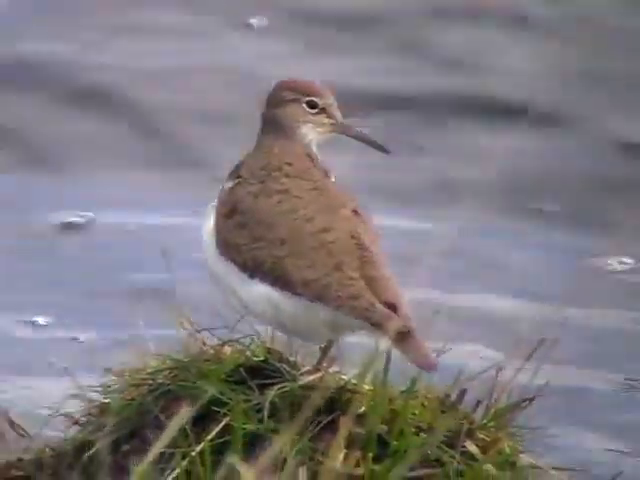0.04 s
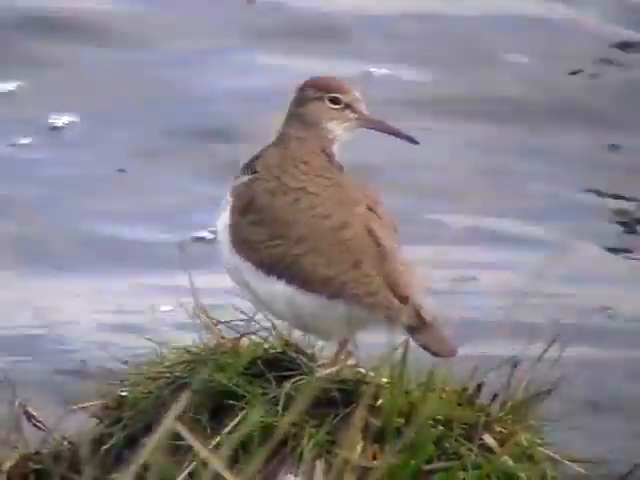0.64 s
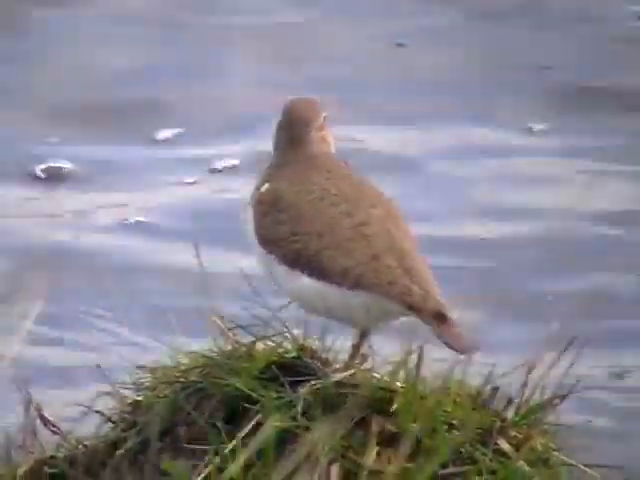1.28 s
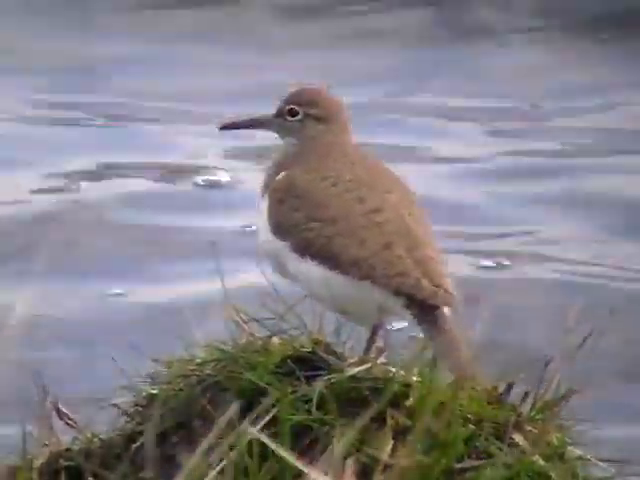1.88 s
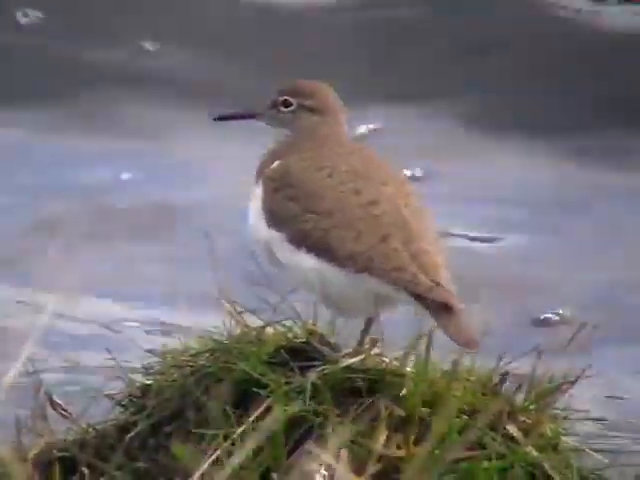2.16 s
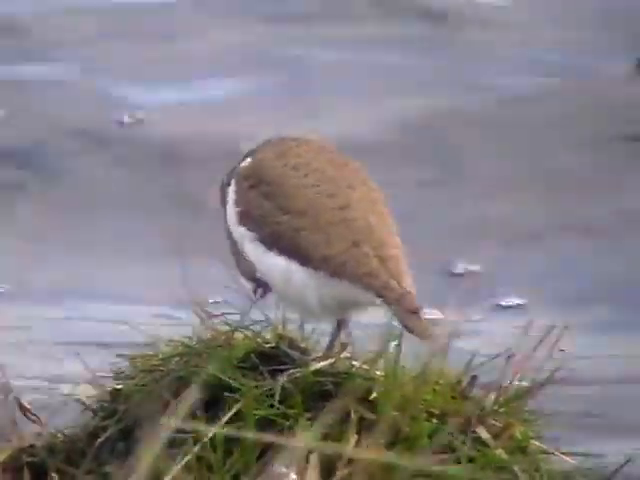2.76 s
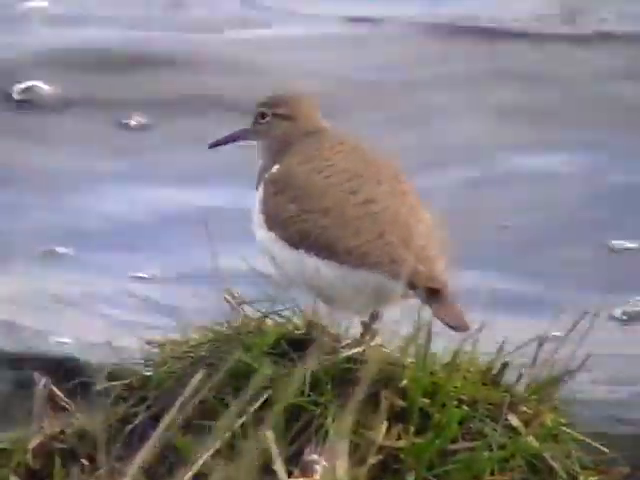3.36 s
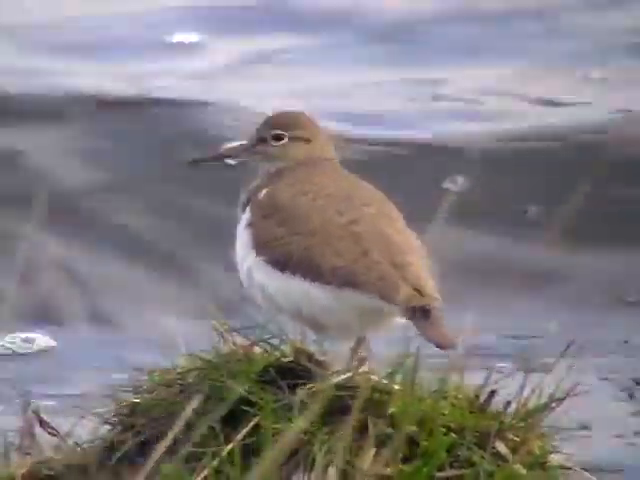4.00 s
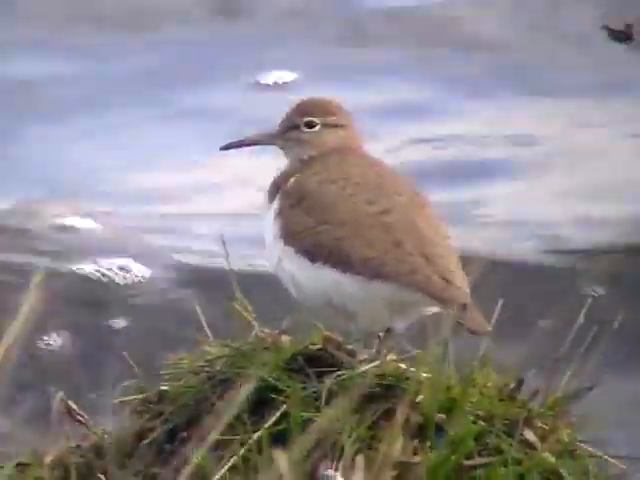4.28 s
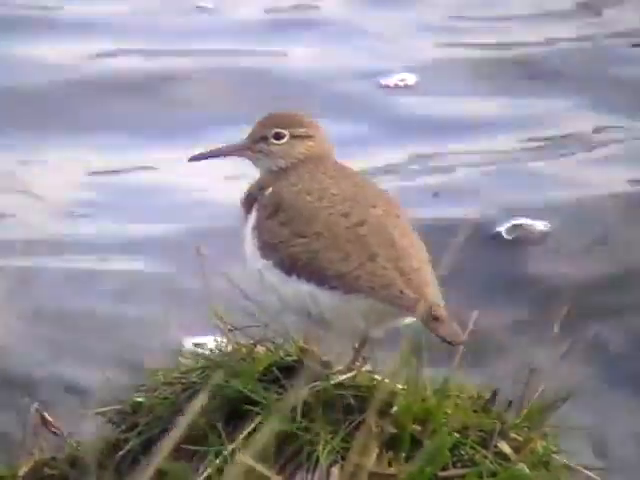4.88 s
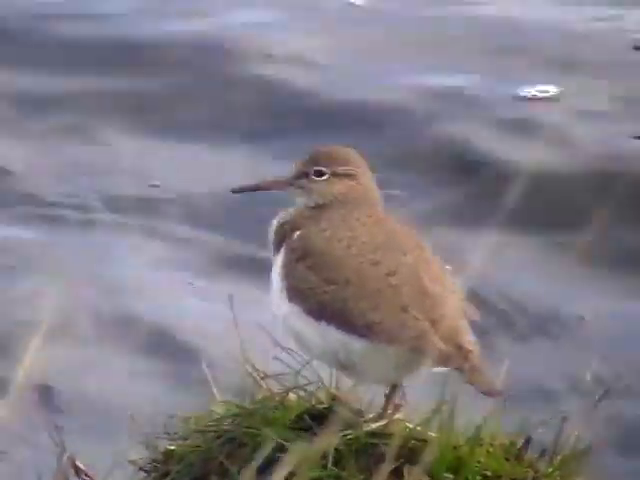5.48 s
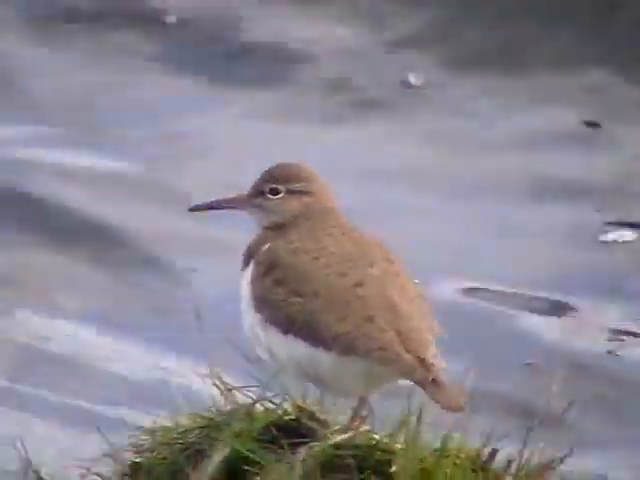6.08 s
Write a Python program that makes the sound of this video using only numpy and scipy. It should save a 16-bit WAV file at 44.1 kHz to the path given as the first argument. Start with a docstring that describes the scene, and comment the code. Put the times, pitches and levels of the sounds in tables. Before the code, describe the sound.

Wind blows directly on a stereo microphone at a lakeshore, over a soft, even rush of water and hissing grass. A short gust thumps and knocks the microphone at about 0.2 seconds, then settles to a light rumble. Some way off, small birds whistle faint, thin, slurred notes, one repeating a plain rising pipe through the first two seconds. At 2.5 seconds the gusts return with low thumps and a couple of small knocks while the birds thin out. From 3.3 seconds the wind is at its strongest, a lumpy rumble leaning right, peaking near 3.5, 4 and 4.9 seconds and buffeting on to the end. The birds pick up again from about 4 seconds, with clearer chirps around 4.4 and 5.5. Dry stems tick faintly now and then, with small clicks near 1 and 4.9 seconds. The background rush swells around 5 seconds.

```python
"""A lakeshore in a rising breeze, heard through a stereo microphone out in the wind.
Close up, gusts rumble on its two ports, eddies thump them and the hardest puffs knock the housing.
Behind that lies the even rush of water and grass, with dry stems ticking against each other.
Some way off, small birds whistle thin slurred notes, many blurred by leaves;
banks and trees return a short, faint echo."""
import sys
import numpy as np
from scipy import signal
from scipy.io import wavfile
from scipy.ndimage import uniform_filter1d

SR = 44100
rng = np.random.default_rng(int(sys.argv[2]) if len(sys.argv) > 2 else 0)


def unload_audio(sound):
    """Save the sound as a 16-bit wav file, at the path given as the first command line argument."""
    columns = np.transpose(np.atleast_2d(sound))
    # keep every value between -1 and 1, then stretch to whole-number steps
    steps = np.round(np.clip(columns, -1, 1) * 32767)
    wavfile.write(sys.argv[1], SR, steps.astype(np.int16))


N = 275625
T = np.arange(N) / SR

# Breeze over the shore: t/s, rush/dB, grass hiss/dB. Levels in all tables are relative.
BREEZE = [(0.0, -55.5, -74.5), (1.88, -55.5, -76.5), (3.38, -55.5, -74), (4.98, -47, -73.5),
          (5.46, -47.5, -72), (5.94, -50.5, -73.5), (6.25, -47.5, -71)]


def from_db(db):
    return 10 ** (np.asarray(db) / 20)


def rms_one(x):
    return x / np.sqrt(np.mean(x ** 2) + 1e-20)


def in_time(rows):
    """One curve per column after t/s, joined by straight lines."""
    times, *columns = np.transpose(rows)
    return [np.interp(T, times, column) for column in columns]


def at_hz(points, hz):
    freqs, values = np.transpose(points)
    return np.interp(np.log(hz), np.log(freqs), values)


def panned(x, pan_db):
    """Positive pan_db favours the left."""
    return x * from_db([[pan_db / 2], [-pan_db / 2]])


def band(x, low_hz, high_hz):
    sos = signal.butter(2, [low_hz, min(high_hz, SR / 2 - 100)], "band", fs=SR, output="sos")
    return signal.sosfilt(sos, x + 1e-18)


def resonate(x, hz, width_hz):
    return signal.lfilter(*signal.iirpeak(hz, hz / width_hz, fs=SR), x)


def add(out, start_s, sound):
    i = max(int(start_s * SR), 0)
    out[..., i:i + sound.shape[-1]] += sound[..., :N - i]


def drift(rate_hz):
    """A smooth random curve with spread 1."""
    step = 40
    pole = np.exp(-2 * np.pi * rate_hz * step / SR)
    slow = signal.lfilter([1], [1, -2 * pole, pole * pole], rng.standard_normal(N // step + 2002))[2000:]
    return np.interp(np.arange(N) / step, np.arange(len(slow)), rms_one(slow))


def noise_bands(spectrum, likeness, count):
    """Half-octaves of stereo noise from 25 Hz up, as (f/Hz, band); together their rms is about 1."""
    edges = 25 * 2 ** (np.arange(count + 1) / 2)
    centres = np.sqrt(edges[1:] * edges[:-1])
    gains = from_db(at_hz(spectrum, centres))
    gains /= np.sqrt(np.sum(gains ** 2 * np.diff(edges)) * 2 / SR)
    for k, hz in enumerate(centres):
        mid, side = gains[k] * band(rng.standard_normal((2, N)), edges[k], edges[k + 1])
        alike = np.clip(at_hz(likeness, hz), -1, 1)
        yield hz, np.sqrt((1 + alike) / 2) * mid + np.sqrt((1 - alike) / 2) * side * [[1], [-1]]


def airy(spectrum, likeness, flicker_db):
    """Wide noise whose bands each flicker a little."""
    return sum(x * from_db(flicker_db * drift(27)) for _, x in noise_bands(spectrum, likeness, count=18))


def buffeting(lump_db=2.0, lump_hz=46.6, surge_db=1.12, surge_hz=11):
    """Turbulence at the ports: big eddies rumble in both, small ones flutter in each, in lumps."""
    # Wind strength at the microphone: t/s, rumble/dB, flutter/dB
    strength = [(0.0, -45, -37.5), (0.07, -46, -65), (0.15, -38.5, -30), (0.21, -42.5, -37),
                (0.29, -44, -32), (0.4, -47.5, -48.5), (0.7, -49, -58.5), (0.9, -45.5, -50.5),
                (1.07, -55, -63), (1.67, -51, -77), (1.71, -43.5, -43.5), (1.9, -55.5, -81),
                (2.33, -54, -66.5), (2.52, -32, -36.5), (2.62, -31, -37), (2.655, -44.5, -41),
                (2.9, -34, -48.5), (3.03, -38.5, -40.5), (3.1, -36, -38.5), (3.14, -43, -55),
                (3.245, -55, -63), (3.26, -20.5, -44.5), (3.38, -37, -45.5), (3.48, -18.5, -39.5),
                (3.6, -30.5, -39), (3.76, -31.5, -42.5), (3.81, -42, -44), (3.91, -31, -53),
                (3.95, -24, -41), (4.04, -30, -37), (4.14, -40.5, -52), (4.35, -26, -37.5),
                (4.44, -36, -43.5), (4.61, -34.5, -40), (4.75, -22, -41), (4.81, -35.5, -46.5),
                (4.9, -18.5, -38), (4.97, -31, -40), (5.05, -39, -43.5), (5.22, -29.5, -48),
                (5.5, -33, -44), (5.7, -38.5, -41.5), (5.83, -38.5, -41.5), (5.97, -30, -42),
                (6.04, -31.5, -38), (6.18, -31, -37.5), (6.25, -48, -55)]
    # It swirls, then settles on the right port: t/s, left-right/dB, unshared rumble/dB
    direction = [(0, -2.5, 5.5), (3.1, 4, 7), (3.3, -5, -6), (6.25, -6, -1)]
    # Spectrum of the turbulence: f/Hz, density/dB
    spectrum = [(20, -24), (40, -19.5), (62, -3.5), (85, -2.5), (120, -1.5), (170, -5.5), (240, -8),
                (340, -17.5), (600, -31), (1200, -53.5), (3000, -86)]
    # Likeness of the two ports: f/Hz, correlation
    likeness = [(30, 0.95), (70, 0.75), (130, 0.26), (220, 0.22), (400, 0.84), (2000, 0.63)]
    rumble_db, flutter_db = in_time(strength)
    facing_db, apart_db = in_time(direction)
    lumps = 1.64 * drift(lump_hz) + 0.44 * np.array([drift(lump_hz), drift(lump_hz)])
    lumps = lump_db * np.clip(lumps, -2, 1.5)
    surges = surge_db * np.clip(drift(surge_hz), -1.5, 1.5)
    out = 0
    for hz, noise in noise_bands(spectrum, likeness, count=14):
        small = at_hz([(90, 0.081), (240, 1)], hz)  # share of small eddies
        level_db = (1 - small) * (rumble_db + 4) + small * (flutter_db + 4.5)
        unrest_db = surges + lumps * (0.62 + 0.4 * small)
        shared = noise.mean(axis=0)
        ports = shared + (noise - shared) * from_db(apart_db * (1 - small))
        out = out + panned(ports * from_db(level_db + unrest_db), facing_db - 4.2 * small)
    return out


def shore_rush():
    """Distant water and grass rush with the breeze over a steady bed of air; the top falls steeply."""
    # Spectrum of the rush: f/Hz, density/dB
    rush_spectrum = [(25, 2), (70, 5.5), (150, 12), (350, 4.5), (680, 4.5), (1200, -5.5), (2400, -15),
                     (3200, -23.5), (4400, -38), (5500, -18), (13000, -40)]
    # Spectrum of the far shore in still air: f/Hz, density/dB
    air_spectrum = [(25, -59), (700, 8), (2000, 2), (3000, -2.5), (4200, -2), (5200, -21), (7000, 2.5),
                    (13000, -15)]
    # Left-right likeness of the shore: f/Hz, correlation
    likeness = [(60, 0.93), (600, 0.98), (2000, 0.85), (4500, 0.7), (13000, 0.33)]
    rush_db, _ = in_time(BREEZE)
    rush = from_db(rush_db + 4.5) * airy(rush_spectrum, likeness, flicker_db=1.3)
    far_shore = from_db(-57.5) * airy(air_spectrum, likeness, flicker_db=2.0)
    return signal.sosfilt(signal.butter(10, 4700, fs=SR, output="sos"), rush + far_shore)


def grass_hiss():
    """The breeze draws a high, wide hiss from the grass."""
    # Spectrum of the grass: f/Hz, density/dB
    spectrum = [(25, -17), (3000, 6), (5500, 6.5), (7000, 0), (9000, 9.5), (12500, 5), (15000, -4)]
    # Left-right likeness of the grass: f/Hz, correlation
    likeness = [(3000, 0.45), (6000, 0.76), (9000, 0.038), (13000, -0.39)]
    _, hiss_db = in_time(BREEZE)
    return from_db(hiss_db + 5) * airy(spectrum, likeness, flicker_db=1.4)


def ringing_hiss():
    """A faint steady hiss, dead centre, rings in a few narrow bands."""
    # Resonances of the hiss: f/Hz, width/Hz, level/dB
    modes = [(5260, 440, -88.5), (7550, 350, -84.5), (8680, 93, -87)]
    return sum(from_db(db) * rms_one(resonate(rng.standard_normal(N), hz, width))
               for hz, width, db in modes)


def stem_ticks(most_per_s=120, decay_s=0.0009):
    """Dry stems snap together; fainter touches come thicker and harder as the grass hiss rises."""
    # The distinct snaps: t/s, level/dB
    snaps = [(0.031, -59), (0.346, -63), (.5872, -69), (.725, -69), (1.0086, -62), (1.828, -65),
             (2.3037, -64), (2.914, -58.5), (2.9375, -62), (3.828, -60), (3.882, -57), (4.1194, -54.5),
             (4.4634, -63), (4.585, -63), (4.862, -56), (5.108, -65), (5.195, -62), (5.255, -63),
             (5.306, -61), (5.6353, -63), (5.852, -56), (6.085, -59)]
    _, hiss_db = in_time(BREEZE)
    clicks = np.zeros(N)
    for start, level_db in snaps:
        add(clicks, start, from_db([level_db + 12]))
    touched = rng.random(N) < most_per_s * from_db(3 * (hiss_db - hiss_db.max())) / SR
    touches = touched * from_db(hiss_db + 15.5 + 4 * np.clip(rng.standard_normal((2, N)), -2, 2))
    t = np.arange(SR // 100) / SR
    rustle = rng.standard_normal(len(t)) * np.exp(-t / decay_s)
    snap = 3 * (t == 0) + 2.5 * rustle / np.linalg.norm(rustle)
    return band(signal.fftconvolve(clicks + touches, snap[None])[:, :N], 3500, 13700)


def whistle(length, pitches, waver, flutter_db, edge_s=0.011, sag_db=14, swell_db=0):
    """A bird's wavering, near-pure tone glides through pitches, losing sag_db an octave below the top."""
    u = np.linspace(0, 1, int(max(length, 0.02) * SR))
    glide = np.interp(u, np.linspace(0, 1, len(pitches)), pitches)
    hz = uniform_filter1d(glide, len(u) // 10)
    wobble, flutter = rms_one(band(rng.standard_normal((2, SR // 3)), 25, 150))[:, -len(u):]
    to_edge_s = np.minimum(u, 1 - u) * length
    fade = np.sin(np.pi / 2 * np.minimum(to_edge_s / edge_s, 1))
    level_db = flutter_db * np.minimum(flutter, 1.2) + sag_db * np.log2(hz / hz.max()) + swell_db * u
    phase = 2 * np.pi * np.cumsum(hz * (1 + waver * wobble)) / SR
    return rms_one(fade * from_db(level_db) * np.sin(phase))


def piping_bird(rise=0.061, ease=1.79):
    """One bird, some way off, repeats a plain whistle that rises and levels out."""
    # Its whistles: t/s, length/s, top f/Hz, level/dB
    pipes = [(0.094, 0.15, 4330, -63.5), (0.93, 0.17, 4390, -63), (1.33, 0.11, 4460, -61),
             (1.686, 0.097, 4260, -61.5), (2.025, 0.12, 4340, -64), (3.162, 0.14, 4280, -72),
             (3.563, .14, 4400, -66), (3.948, 0.13, 4380, -62.5), (4.718, 0.17, 4350, -64.5)]
    out = np.zeros(N)
    glide = 1 - rise * np.linspace(1, 0, 9) ** ease
    for start, length, top_hz, level_db in pipes:
        note = whistle(length, top_hz * glide, waver=0.0012, flutter_db=3, edge_s=0.0053, sag_db=-6)
        add(out, start, from_db(level_db) * note)
    return out


def shore_echo(x, t60):
    """Banks and trees scatter a thin tail, different at each side."""
    t = np.arange(SR // 2) / SR
    tail = rng.standard_normal((2, len(t))) * from_db(-60 * t / t60) * (t > 0.012)
    return signal.fftconvolve(x[None], tail / np.linalg.norm(tail[0]))[:, :N]


def through_foliage(note, blur, decay_s=0.014):
    """Leaves on the way to the microphone return late copies of a note and break it up."""
    t = np.arange(SR // 15) / SR
    late = rng.standard_normal(len(t)) * np.exp(-t / decay_s)
    paths = (t == 0) + blur * from_db(-2) * late / np.linalg.norm(late)
    heard = signal.fftconvolve(note, paths)
    return heard * np.linalg.norm(note) / np.linalg.norm(heard)


def songbirds():
    """Overlapping songs from among the leaves: slurred notes, some clear and some hoarse."""
    # Kinds of note: name -> pitch as a share of the top pitch, evenly spaced through the note
    slurs = {"sweep": [.68, .72, .76, .81, .96, .99, 1], "climb": [.87, .92, .96, .99, 1], "arch": [.93, 1,
             .99, .95, .88], "dip": [.93, .78, .71, .77, .89, 1], "scoop": [1, .91, .87, .87, .9, .98],
             "fall": [1, .99, .93, .86, .71], "hook": [.84, .85, .91, .96, 1, .8], "flick": [1, .98, .955,
             .935, .935, .94, .935, .82, .68], "ledge": [.98, 1, 1, .99, .88, .71]}
    # The notes sung: t/s, length/s, top f/Hz, level/dB, roughness (0 is clear), kind
    song = [(0.112, 0.18, 3590, -65.5, 0, "scoop"), (0.373, 0.11, 3596, -59.5, 0.4, "arch"),
            (0.58, 0.092, 4190, -58.5, 0.9, "sweep"), (0.744, 0.092, 4080, -60, 1.1, "sweep"),
            (0.811, 0.085, 4320, -63, 0.5, "scoop"), (.902, 0.073, 2900, -67, .3, "arch"),
            (1.02, 0.033, 3400, -65, 0.5, "fall"), (1.37, 0.037, 3220, -63, .7, "arch"),
            (1.467, 0.047, 4070, -63, 1, "sweep"), (1.596, 0.032, 3540, -61.5, 0.8, "fall"),
            (1.652, 0.056, 4150, -60.5, 1, "sweep"), (1.776, .05, 2900, -65, .3, "climb"),
            (1.908, 0.125, 3100, -63.5, 0.35, "climb"), (2.14, 0.047, 4560, -63, 1, "dip"),
            (2.247, .04, 3860, -66, 1, "fall"), (2.298, 0.066, 4740, -65, 1, "dip"),
            (2.507, 0.05, 4100, -65.5, .5, "ledge"), (2.708, .07, 3820, -70, 0.8, "arch"),
            (2.868, 0.057, 3950, -68, .7, "arch"), (3.795, 0.047, 4480, -67, 0.6, "arch"),
            (3.891, 0.093, 3730, -68, 0.6, "arch"), (3.908, 0.053, 4030, -65, 0.3, "arch"),
            (3.987, 0.056, 3900, -65, .7, "fall"), (4.061, 0.068, 3290, -65, 0.8, "climb"),
            (4.136, 0.044, 4570, -64.5, 0.5, "scoop"), (4.169, 0.047, 3200, -70, 0.6, "arch"),
            (4.172, 0.069, 5000, -57.5, 0.4, "flick"), (4.305, 0.092, 4330, -65, 0.5, "arch"),
            (4.338, .03, 4680, -64, 0.6, "arch"), (4.377, 0.057, 4370, -54.5, .35, "ledge"),
            (4.497, 0.058, 4050, -62, 0.5, "arch"), (4.534, 0.1, 4640, -55.5, 0.47, "flick"),
            (4.77, 0.071, 3720, -59, .3, "climb"), (4.928, 0.05, 4800, -60, 0.5, "dip"),
            (5.086, 0.066, 4860, -61, 0.65, "dip"), (5.284, 0.071, 4080, -60, 0.6, "fall"),
            (5.448, 0.1, 4200, -53.5, 0.24, "fall"), (5.646, 0.1, 3720, -55.5, 0.7, "hook"),
            (5.922, 0.05, 4470, -63, 0.8, "sweep")]
    out = np.zeros(N)
    for start, length, top_hz, level_db, rough, kind in song:
        note = whistle(length, top_hz * np.array(slurs[kind]), waver=0.011 * rough,
                       flutter_db=4.5 * rough, edge_s=0.013, sag_db=5, swell_db=1)
        add(out, start, from_db(level_db) * through_foliage(note, blur=rough))
    return out


def eddy_thumps(rise=0.56, fall=0.72):
    """An eddy briefly swings the pressure, out of step at the ports; air tears at the crests."""
    # Eddies on the microphone: t/s, swing/dB, f/Hz, crackle/dB, time scale/s, left-right/dB
    eddies = [(0.146, -22.5, 148, -66, 0.0071, 9), (.2425, -21, 160, -35.5, 0.0047, 11),
              (0.259, -24.5, 207.6, -36.5, 0.018, -13), (.463, -22, 181, -57, 0.0074, 0.5),
              (.54, -31, 108, -76, 0.0062, -6), (.86, -34, 153, -74, 0.01, -11),
              (1.128, -27.5, 147.6, -74, 0.0062, -8.5), (1.237, -34.5, 137, -66, 0.0038, -9),
              (1.755, -29.5, 217, -50, 0.016, -1), (2.048, -32, 121, -70, 0.014, 4),
              (2.435, -24.5, 168, -66, 0.017, 3), (2.52, -20, 154, -50, 0.0057, -15),
              (2.558, -20, 207, -51, 0.0055, 12.5), (2.598, -23.5, 190, -64, 0.0081, -12),
              (2.616, -18.5, 145, -64, 0.0067, -2), (2.673, -21.5, 190, -52, 0.0044, 5),
              (2.739, -24.5, 190, -46, 0.0083, -14), (2.755, -17.5, 185, -58, 0.0056, -12),
              (2.965, -20, 173, -68, 0.0055, -8), (3.015, -23.5, 230, -66, 0.009, 1),
              (3.069, -14.5, 311, -52, 0.0045, -13), (3.495, -17.5, 128.4, -70, 0.024, -5),
              (3.553, -32, 78, -72, 0.015, 0), (3.64, -26.5, 130.6, -72, 0.033, -3),
              (3.72, -12, 114, -65, 0.0048, -3), (3.762, -19.5, 151, -68, 0.0067, -13.5),
              (3.849, -19.5, 206, -66, 0.0084, -8), (3.883, -14, 105, -83, 0.0057, -11),
              (3.931, -15, 201, -59, 0.0038, -14.5), (3.944, -18, 80, -70, 0.019, -9),
              (3.979, -20, 140, -68, 0.0036, -12), (4.027, -17, 85, -61, 0.0068, 1),
              (4.084, -17, 128, -66, 0.0055, -14), (4.343, -18.5, 108, -68, 0.016, -13),
              (4.49, -18, 128, -66, 0.0034, -17.5), (4.565, -15.5, 144, -62, 0.0073, -8.5),
              (4.64, -25, 120, -68, 0.0043, -6), (4.762, -18.5, 92, -71, 0.013, -5),
              (4.893, -22, 195, -38, 0.016, -2), (4.917, -13.5, 82, -55, 0.0085, -3),
              (5.339, -21.5, 128.5, -64, 0.0051, -13), (5.969, -15.5, 158, -65, 0.006, -10),
              (6.079, -17.5, 160, -58, 0.0044, -9), (6.112, -17, 194, -49, 0.009, -1),
              (6.19, -19, 87, -66, 0.015, -4)]
    out = np.zeros((2, N))
    t = np.arange(-SR // 10, SR // 10) / SR
    for when, swing_db, hz, crackle_db, scale_s, pan_db in eddies:
        width_s = scale_s * np.where(t < 0, rise, fall)  # it hits faster than it leaves
        swell = np.exp(-0.5 * (t / width_s) ** 2)
        phase = 2 * np.pi * (hz * t + rng.random()) + np.array([[0], [hz / 140]])
        jitter = rms_one(band(rng.standard_normal((2, len(t))), 27, 146))
        swing = np.sin(phase + 0.61 * jitter)
        tearing = band(rng.standard_normal((2, len(t))) * swing ** 4, 368, 1440)
        crackle = rms_one(band(tearing, 170, 1200))
        thump = from_db(swing_db - 3) * swing + from_db(crackle_db - 4.5) * crackle
        add(out, when + t[0], panned(swell * thump, pan_db))
    return out


def housing_slaps(decay_s=0.0031, pan_db=-18.5):
    """Sudden, fast-dying bursts of air knock the microphone housing on its right side."""
    # The hardest puffs: t/s, level/dB, upper f/Hz
    puffs = [(0.239, -39, 3000), (.246, -33.5, 1400), (0.257, -49, 1500), (0.267, -42, 1500),
             (2.557, -48, 1400), (2.6745, -42.5, 1400), (2.7483, -37.5, 1090)]
    # Resonances of the housing: f/Hz, width/Hz, level/dB
    modes = [(840, 900, -1), (1260, 540, 16), (1540, 140, -29), (2400, 450, -3)]
    out = np.zeros(N)
    t = np.arange(SR // 25) / SR
    for start, level_db, upper_hz in puffs:
        burst = band(rng.standard_normal(len(t)) * np.exp(-t / decay_s), 400, upper_hz)
        knock = sum(from_db(db) * resonate(burst, hz, width) for hz, width, db in modes)
        add(out, start, from_db(level_db) * knock / np.abs(knock).max())
    return panned(out, pan_db)


def far_twitter(per_s=16, low_hz=3100, span_hz=1142, high_lift_db=1.0):
    """Birds much farther off slur short notes at random, the higher ones a touch louder."""
    # Spells of twitter: start t/s, end t/s, level/dB
    spells = [(0.3, 2.2, -69), (2.2, 3.15, -75), (3.801, 5.6, -75)]
    out = np.zeros(N)
    for start, end, level_db in spells:
        count = int(per_s * (end - start))
        for when, length, height, slope, arch in rng.random((100, 5))[:count]:
            contour = 1 + 0.27 * np.array([0.5 - slope, arch - 0.5, slope - 0.5])
            pitches = (low_hz + span_hz * height) * contour
            note = whistle(0.05 + 0.0351 * length, pitches, waver=0.007, flutter_db=4.5)
            add(out, start + when * (end - start), from_db(level_db + high_lift_db * height) * note)
    return out


def far_high_bird():
    """A distant bird whistles high arches, blurred by the leaves between."""
    # Its notes: t/s, length/s, top f/Hz, level/dB
    notes = [(.38, 0.1, 5350, -75), (0.54, 0.094, 5520, -73), (0.686, 0.077, 5370, -71),
             (0.848, .09, 5350, -75), (1.167, .09, 5200, -75), (1.907, .07, 5050, -79),
             (3.384, 0.07, 5050, -74), (3.978, 0.068, 5620, -76)]
    out = np.zeros(N)
    for start, length, top_hz, level_db in notes:
        arch = 1 - 0.3 * (np.linspace(0, 1, 7) - rng.uniform(0.5, 0.65)) ** 2
        note = whistle(length, top_hz * arch, waver=0.011, flutter_db=5)
        add(out, start, from_db(level_db) * through_foliage(note, blur=1))
    return out


def chips_and_clicks():
    """Thin high bird chips, plus a woody tick and a sharp click, each a brief swell of band noise."""
    # Chips, the tick (1.02 s) and the click (4.867 s): t/s, f/Hz, width/Hz, level/dB, time spread/s
    bursts = [(.913, 7800, 600, -75, .005), (1.02, 2900, 1000, -50.5, 0.0028),
              (1.63, 4260, 700, -57, 0.0018), (1.84, 5200, 400, -71, .012), (2.315, 8000, 500, -74, .008),
              (4.867, 3580, 2400, -48, 0.0012), (5.2, 8160, 1200, -64, .004), (5.64, 5500, 700, -66, .007),
              (5.784, 7800, 600, -59.5, .007)]
    out = np.zeros(N)
    t = np.arange(-SR // 20, SR // 20) / SR
    for when, hz, width, level_db, spread_s in bursts:
        noise = rms_one(band(rng.standard_normal(len(t)), hz - width / 2, hz + width / 2))
        add(out, when + t[0], from_db(level_db) * noise * np.exp(-0.5 * (t / spread_s) ** 2))
    return out


def scene():
    """Wind right on the microphone, water and grass around it, birds some way off near the centre."""
    wind = buffeting() + eddy_thumps() + housing_slaps()
    shore = shore_rush() + grass_hiss() + stem_ticks()
    farther_off = piping_bird() + songbirds() + far_high_bird() + far_twitter() + chips_and_clicks()
    hiss = ringing_hiss()
    echo = from_db(-10.5) * shore_echo(farther_off, t60=0.076)
    return wind + shore + hiss + panned(farther_off, pan_db=1) + echo


def record(dry):
    """The microphone: close ports share the deep bass; low cut, narrow low-mid notch, steep top end."""
    side = from_db(0.4) * (dry[0] - dry[1]) / 2
    side = signal.sosfilt(signal.butter(2, 48, "high", fs=SR, output="sos"), side)
    ports = dry.mean(axis=0) + side * [[1], [-1]]
    low_cut = signal.sosfilt(signal.butter(2, 30, "high", fs=SR, output="sos"), ports)
    notched = signal.lfilter(*signal.iirnotch(495.7, Q=4.87, fs=SR), low_cut)
    return signal.sosfilt(signal.ellip(10, 0.2, 80, 12850, fs=SR, output="sos"), notched)


dry = scene()
out = record(dry)
unload_audio(out)
```